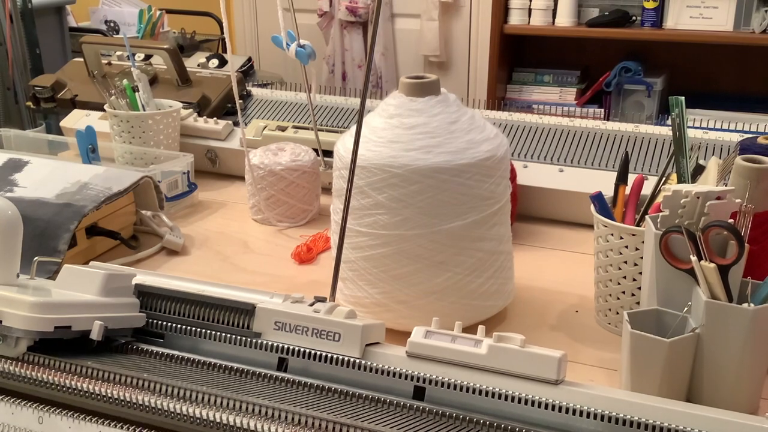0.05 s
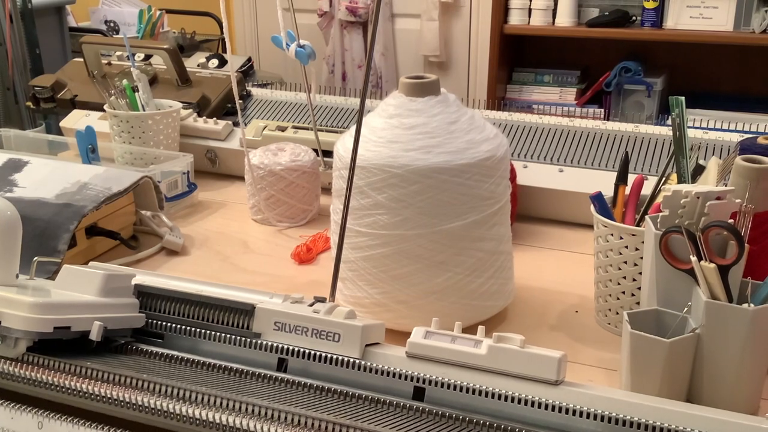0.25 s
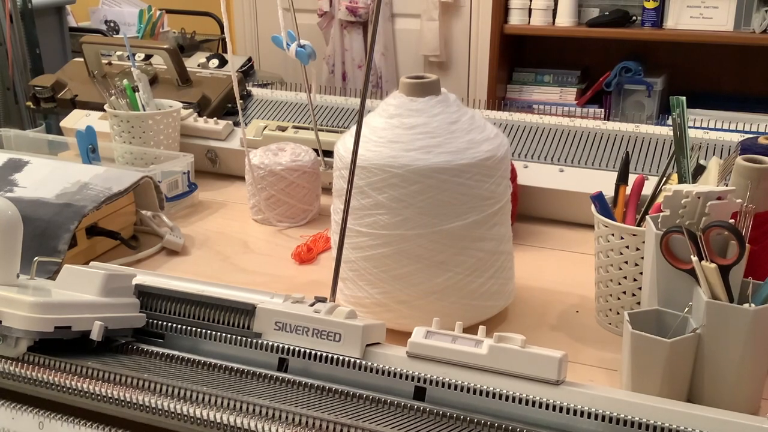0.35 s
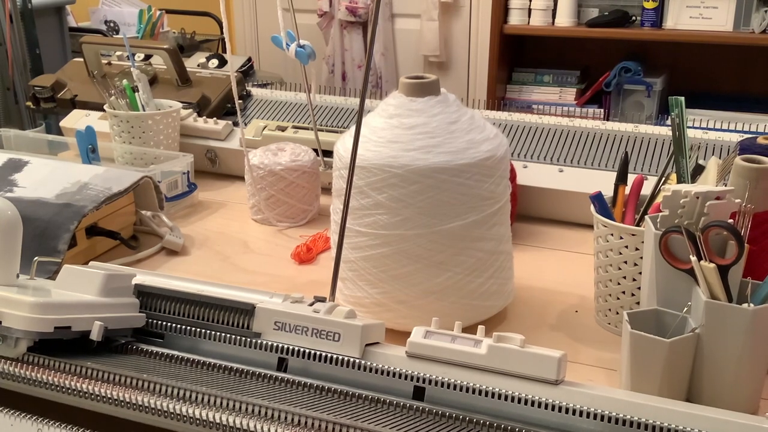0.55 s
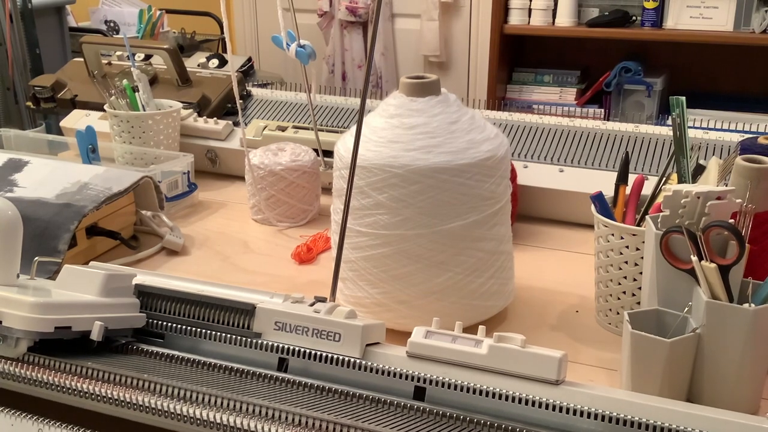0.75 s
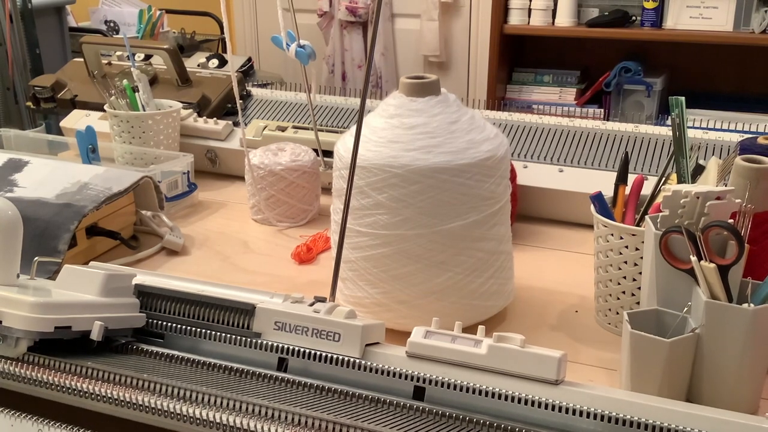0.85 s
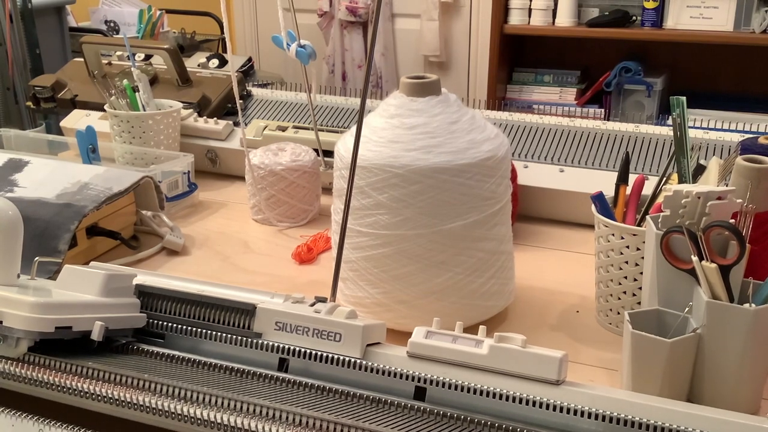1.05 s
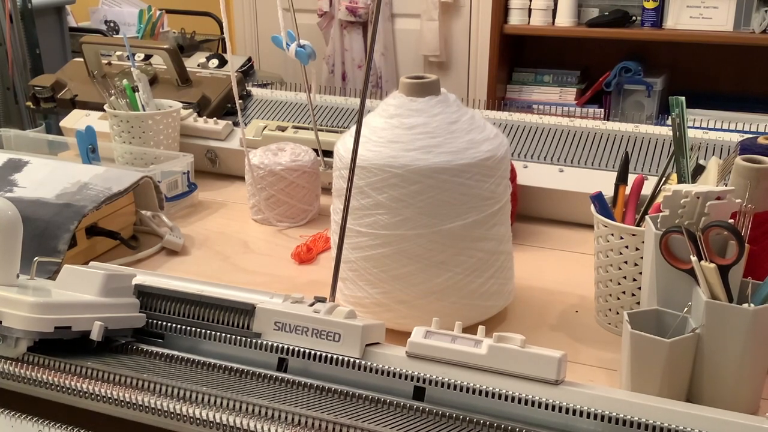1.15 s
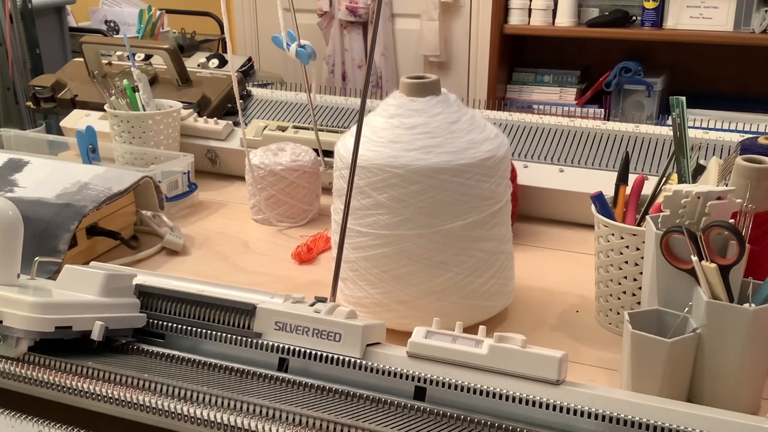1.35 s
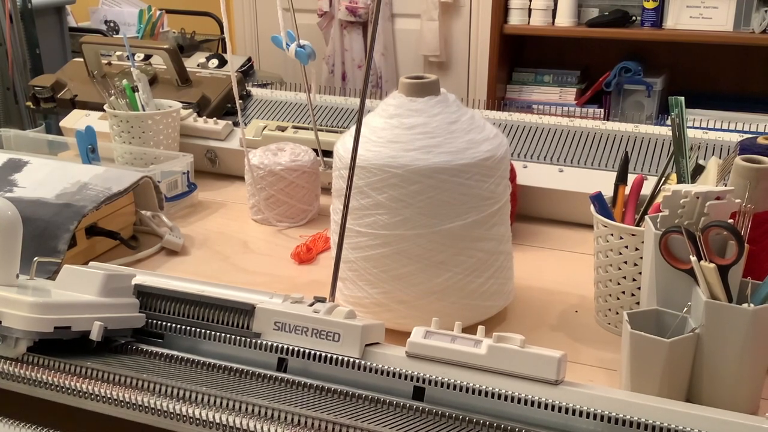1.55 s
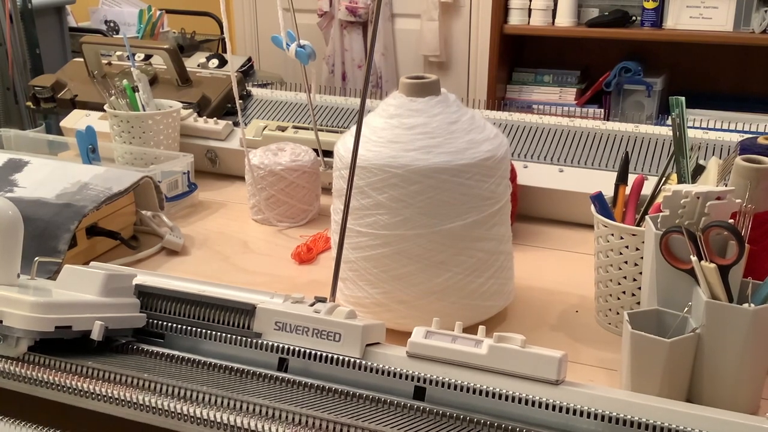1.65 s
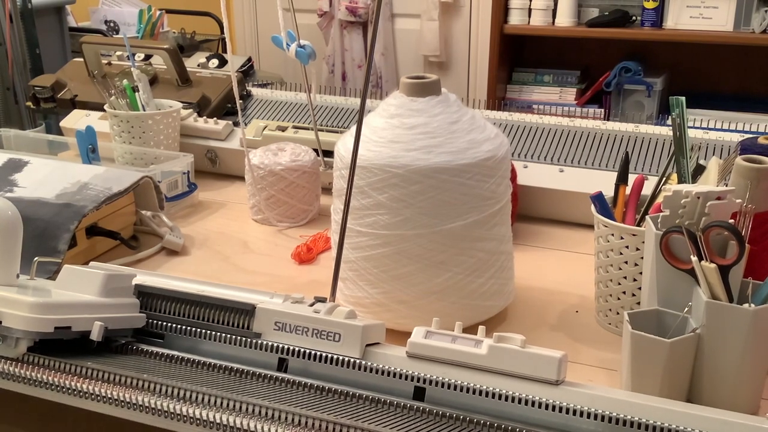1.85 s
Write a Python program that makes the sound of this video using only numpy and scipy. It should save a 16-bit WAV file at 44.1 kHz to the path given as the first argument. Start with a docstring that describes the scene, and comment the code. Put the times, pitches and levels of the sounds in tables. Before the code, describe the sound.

A knitting machine clacks and clicks in a small room. After light latch clicks, a part snaps home at about 0.2 seconds and again, louder, at 0.4, each clack rattling the needles and making the table boom briefly. From 0.8 to 1.8 seconds a lever gives five quieter, sharp clicks, most followed by a duller knock. Faint room noise lies underneath throughout.

```python
"""Knitting machine on a worktable.

In a small room a latch clicks, and a part snaps home twice with a hard clack that rattles the
needle bed and sets the table booming. Then a lever clicks five times, most clicks followed by a
duller knock on its stop, over faint room noise. Each contact is a burst of bending waves plus
the ringing modes of the part struck."""
import sys
import numpy as np
from scipy import signal
from scipy.fft import rfft, irfft
from scipy.io import wavfile

SR = 44100
rng = np.random.default_rng(int(sys.argv[2]) if len(sys.argv) > 2 else 0)


def output_pcm(signal):
    """Save a mono or channel-first signal as 16-bit PCM at the path in sys.argv[1].

    Samples are clipped to [-1, 1] before scaling.
    """
    pcm = np.clip(np.atleast_2d(signal).T, -1, 1) * 32767
    wavfile.write(sys.argv[1], SR, np.round(pcm).astype(np.int16))


N = 83790
T = np.arange(int(.8 * SR)) / SR
BANDS_HZ = 50 * 2 ** (np.arange(18) / 2)


def amp(db):
    """Decibels to gain."""
    return 10 ** (np.asarray(db) / 20)


def along(points, hz):
    """Interpolate (Hz, value) points on a log frequency axis."""
    f, v = np.transpose(points)
    return np.interp(np.log(hz + 1), np.log(f + 1), v)


def sized(x):
    """Scale to the energy of 10 ms at rms 1."""
    return x / np.sqrt(np.sum(x ** 2, axis=-1, keepdims=True) / (SR / 100) + 1e-20)


def add(out, start_s, x):
    """Mix x into out from start_s."""
    i = max(0, round(start_s * SR))
    out[i:i + len(x)] += x[:len(out) - i]


def fade(t, rise_s, t60):
    """Quick rise and exponential decay from t = 0."""
    t = np.maximum(t, 0)
    return (1 - np.exp(-t / rise_s)) * np.exp(-np.log(1000) * t / t60)


def noise_bands(size):
    """White noise split into half octaves."""
    octaves = np.log2(np.fft.rfftfreq(size, 1 / SR) + 1) - np.log2(BANDS_HZ)[:, None]
    return irfft(rfft(rng.standard_normal(size)) * np.maximum(0, 1 - 2 * abs(octaves)), size)


# Bending-wave decay. Each row: frequency in Hz, base T60 in seconds.
BODY_T60 = [(100, .25), (600, 0.18), (1500, 0.079), (4000, 0.041), (12000, 0.013)]


def strike(colour, modes, tilt, ring_db, ring_scale, body_scale, rise_s, wet_db, favour=(1000, 0)):
    """One contact: dense bending waves, treble first, and the part's distinct modes."""
    def emphasis_db(f):
        """Tilt above 500 Hz, plus the range favoured by the point of contact."""
        favour_hz, favour_db = favour
        bump = np.exp(-(np.log2(f / favour_hz) / 0.28) ** 2 / 2)
        return tilt * np.log2(np.maximum(f, 500) / 2000) + favour_db * bump

    bands = noise_bands(size=8192)
    t, hz = T[:bands.shape[1]], BANDS_HZ[:, None]
    travel_s, band_rise_s = 0.0017 * 1000 / hz, rise_s * np.sqrt(1000 / hz)
    waves = sized(bands * fade(t - travel_s, band_rise_s, body_scale * along(BODY_T60, hz)))
    body = sized(np.sum(waves * amp(along(colour, hz) + emphasis_db(hz)), axis=0))
    mode_hz, width_hz, db = np.transpose(modes)[:, :, None]
    t60 = np.log(1000) / (np.pi * np.maximum(width_hz / ring_scale, .008 * mode_hz))
    detune = 1 + .008 * rng.standard_normal(mode_hz.shape)  # the hand's grip shifts the modes
    cycles = mode_hz * detune * t + rng.random(mode_hz.shape)
    gain = amp(db + emphasis_db(mode_hz) + rng.standard_normal(mode_hz.shape))
    rings = sized(np.sin(2 * np.pi * cycles) * fade(t, rise_s, t60))
    rings *= amp(ring_db) * gain / np.linalg.norm(gain)
    spread = 1 / (1 + (mode_hz / 3800) ** 2)  # high modes beam at the microphone, past the room
    beamed = np.sum(rings * (1 - spread), axis=0)
    return in_room(body + np.sum(rings * spread, axis=0), wet_db, beamed)


# Hard clacks. Each row: start in seconds, level in dB, tilt in dB/octave, table boom in dB,
# favoured frequency in Hz, its gain in dB.
CLACKS = [(0.2263, -20.5, -1, -31.5, 2486, 0), (.408, -17, 0, -33.5, 9000, -1.5)]
# Clack bending waves. Each row: frequency in Hz, band level in dB.
CLACK_COLOUR = [(50, -28.5), (100, -9), (300, -12.5), (650, 1), (1100, -0.5), (1700, -1.5), (2500, 3),
                (3400, -3.5), (4600, 0), (6500, -7.5), (10000, 1), (15000, -14)]
# Needle bed modes. Each row: frequency in Hz, base width in Hz, level in dB.
BED_MODES = [(577, 30, -6), (665.8, 15, -4.5), (752, 18, -4), (1043, 31, -13), (1380, 16, -10),
             (1748, 34, -30.5), (2420, 24, -8), (2591, 67, -4), (4646, 57, -10.5), (6110, 46, -21.5),
             (7100, 70, -18), (8080, 220, -10.5), (9200, 40, -17.5), (10600, 85, -6.5), (11300, 60, -16.5)]


def clacks():
    """A part snaps home on the needle bed, shaking the table and the needles."""
    out = np.zeros(N)
    for start_s, db, tilt, boom_db, *favour in CLACKS:
        blow = strike(CLACK_COLOUR, BED_MODES, tilt, ring_db=-1, ring_scale=1.0, body_scale=0.98,
                      rise_s=0.00094, wet_db=-9.5, favour=favour)
        add(out, start_s, amp(db) * blow)
        add(out, start_s, amp(boom_db) * table_boom())
        add(out, start_s, amp(db) * needle_chatter())
    return out


# Loose parts. Each row: start in seconds, level in dB, tilt in dB/octave.
RATTLES = [(0.2535, -34.5, 3.5), (.432, -27.5, -1), (0.4367, -31, 2), (.443, -27, 1.5), (0.458, -39, 3.5),
           (.573, -61, -2.5), (1.573, -47, -1), (1.595, -58, 16), (1.633, -50, -1)]
# Rattle and chatter spectrum. Each row: frequency in Hz, band level in dB.
RATTLE_COLOUR = [(150, -10), (600, -1.5), (1500, -1), (2500, -5.5), (5000, -1.5), (9000, -8), (15000, -17)]


def rattles():
    """Loose parts knock and briefly ring the needle bed."""
    out = np.zeros(N)
    for start_s, db, tilt in RATTLES:
        rattle = strike(RATTLE_COLOUR, BED_MODES, tilt, ring_db=-7, ring_scale=.6, body_scale=0.68,
                        rise_s=0.0025, wet_db=-3)
        add(out, start_s, amp(db) * rattle)
    return out


def needle_chatter(gain_db=-10.5, delay_s=.028, spread_s=0.0078, ticks_per_s=900):
    """Needles shaken in their slots: a swarm of tiny ticks."""
    bands = noise_bands(size=8192)
    t = T[:bands.shape[1]]
    tick_bands = sized(bands * fade(t, rise_s=.0003, t60=0.012))
    tick = np.sum(tick_bands * amp(along(RATTLE_COLOUR, BANDS_HZ[:, None])), axis=0)
    contacts = rng.standard_normal(len(t)) * (rng.random(len(t)) < ticks_per_s / SR)
    contacts *= np.exp(-((t - delay_s) / spread_s) ** 2 / 2)
    return amp(gain_db) * in_room(sized(signal.fftconvolve(contacts, tick)), wet_db=-7.5)


# Low table modes. Each row: frequency in Hz, level in dB, T60 in seconds.
TABLE_MODES = [(69, -4, 0.4), (97.74, -7, 0.88), (135.8, 2.5, 0.56), (195, -13, 0.41), (262.8, -5.5, 0.14),
               (300, -15.5, 0.1), (403.4, -9, 0.28), (587, -13.5, 1), (610, -12, 0.36), (642, -11, 0.88),
               (726, -16.5, .55), (725, -1.5, 0.44), (876, -20.5, 0.45), (1034, -18, 0.28)]


def table_boom(delay_s=.014, rise_s=0.0073):
    """The table takes up a blow slowly and hums on."""
    return sum(amp(db) * np.sin(2 * np.pi * (hz * T + rng.random())) * fade(T - delay_s, rise_s, t60)
               for hz, db, t60 in TABLE_MODES)


# Lever clicks. Each row: start in seconds, level in dB, tilt in dB/octave, table boom in dB,
# favoured frequency in Hz, its gain in dB.
LEVER_CLICKS = [(0.8597, -37, 0.1, -65, 2540, 6.5), (1.0822, -32, -0.44, -53, 4000, 1.5),
                (1.3285, -33.5, 0.1, -67, 4300, 0), (1.5109, -32, 1.3, -49, 1480, 3.5),
                (1.6624, -30, -0.56, -62.5, 2360, 1)]
# Lever bending waves. Each row: frequency in Hz, band level in dB.
LEVER_COLOUR = [(100, -21), (350, -9), (600, -6), (1300, 0.5), (2300, -2), (3200, -5), (4500, 0.5),
                (6800, -19.5), (10000, -11), (15000, -15.5)]
# Lever modes. Each row: frequency in Hz, base width in Hz, level in dB.
LEVER_MODES = [(1170, 10, -0.5), (1564, 63, 3), (1890, 54, -12), (2390, 70, 7.5), (2786, 98, 0.5),
               (3025, 57, 1.5), (3152, 24, -1.5), (4018, 160, 7.5), (7070, 140, -12), (9270, 29, -9)]


def lever_clicks():
    """The lever engages with a sharp click that stirs the table."""
    out = np.zeros(N)
    for start_s, db, tilt, boom_db, *favour in LEVER_CLICKS:
        click = strike(LEVER_COLOUR, LEVER_MODES, tilt, ring_db=-4.5, ring_scale=1.0, body_scale=1.0,
                       rise_s=0.00075, wet_db=-6, favour=favour)
        add(out, start_s, amp(db) * click)
        add(out, start_s, amp(boom_db) * table_boom())
    return out


# Knocks on the stop. Each row: start in seconds, level in dB, tilt in dB/octave, table boom in dB,
# favoured frequency in Hz, its gain in dB.
KNOCKS = [(.797, -50.5, -7.5, -60.5, 450, -3), (.927, -35.5, 2.4, -52, 687, 10),
          (.985, -63, 10, -79, 714, 26), (1.391, -35.5, 1, -56, 1210, -4), (1.545, -33, 3.5, -73, 900, 4),
          (1.609, -42, -3, -52, 600, 13), (1.726, -40, -4.5, -70, 590, 7.5),
          (1.7546, -34.5, 1.2, -69, 1850, 11), (1.772, -44.5, -2, -65, 780, 5)]
# Knock bending waves. Each row: frequency in Hz, band level in dB.
KNOCK_COLOUR = [(60, -59), (130, -3.5), (300, -0.5), (700, 6), (1100, -1.5), (1600, 0), (2500, -4.5),
                (4500, -11), (7000, -24.5), (15000, -34)]
# Stop modes. Each row: frequency in Hz, base width in Hz, level in dB.
STOP_MODES = [(750, 145, -4), (1022, 67, -9.5), (1390, 67, -11), (2100, 40, -23), (2485, 27, -19.5),
              (2900, 15, -18)]


def lever_knocks():
    """The lever meets its stop with a dull knock that stirs the table."""
    out = np.zeros(N)
    for start_s, db, tilt, boom_db, *favour in KNOCKS:
        knock = strike(KNOCK_COLOUR, STOP_MODES, tilt, ring_db=-6.5, ring_scale=1.8, body_scale=1.3,
                       rise_s=0.00067, wet_db=-11, favour=favour)
        add(out, start_s, amp(db) * knock)
        add(out, start_s, amp(boom_db) * table_boom())
    return out


# Latch clicks. Each row: start in seconds, level in dB, tilt in dB/octave.
LATCH_CLICKS = [(0.0098, -34, 0.5), (.180, -33, 0.5), (0.3526, -37, 0), (0.366, -36, 0)]
# Latch bending waves. Each row: frequency in Hz, band level in dB.
LATCH_COLOUR = [(100, -21), (350, -17.5), (700, -9), (1300, -2.5), (2200, -1), (3200, -10.5), (4500, -3.5),
                (6500, -19), (9500, -10), (15000, -31)]
# Latch modes. Each row: frequency in Hz, base width in Hz, level in dB.
LATCH_MODES = [(1166, 7.6, -5.5), (1280, 49, 10.5), (1546, 45, -26), (2450, 110, -17), (2750, 35, -11.5),
               (4367, 93.4, 11), (8000, 43, -8.5), (8580, 45, -17.5)]


def latch():
    """Light contacts ring the latch."""
    out = np.zeros(N)
    for start_s, db, tilt in LATCH_CLICKS:
        click = strike(LATCH_COLOUR, LATCH_MODES, tilt, ring_db=-5, ring_scale=0.4, body_scale=0.88,
                       rise_s=0.0018, wet_db=-7)
        add(out, start_s, amp(db) * click)
    return out


# Room decay. Each row: frequency in Hz, T60 in seconds.
ROOM_T60 = [(100, 0.6), (600, 0.27), (2000, 0.26), (5000, 0.22), (14000, .22)]


def in_room(x, wet_db, beamed=0, delay_s=0.002, rise_s=0.0028):
    """Direct sound plus a diffuse tail; the beamed part arrives directly only."""
    hz, t, spectra = signal.stft(rng.standard_normal(SR // 2), SR, nperseg=256)
    decay = fade(t - delay_s, rise_s, along(ROOM_T60, hz)[:, None])
    tail = signal.istft(spectra * decay, SR, nperseg=256)[1]
    out = signal.fftconvolve(x, amp(wet_db) * tail / np.linalg.norm(tail))
    out[:len(x)] += x + beamed
    return out


# Room noise spectrum. Each row: frequency in Hz, relative density in dB.
AIR_SPECTRUM = [(15, -38), (25, -24), (101, -7.5), (169, -15), (227, -13.5), (552, -13.5), (614, -10.5),
                (871, -18), (2010, -25), (2850, -30), (3090, -29.5), (3720, -34), (4500, -26), (9300, -41),
                (15500, -39)]
# Treble of the room noise. Each row: time in seconds, gain in dB.
HISS_LEVEL = [(0, -1.5), (.17, 0), (.65, -0.5), (1.3, 3.5), (1.7, 5), (1.819, -4), (1.9, -9)]


def room_noise(level_db=-61, hiss_from_hz=2500):
    """Faint air whose hiss swells a little and sinks away."""
    hz = np.fft.rfftfreq(N, 1 / SR)
    spectrum = rfft(rng.standard_normal(N)) * amp(along(AIR_SPECTRUM, hz))
    air = irfft(spectrum, N)
    hiss = irfft(spectrum * hz ** 2 / (hz ** 2 + hiss_from_hz ** 2), N)
    hiss_gain = amp(np.interp(np.arange(N) / SR, *np.transpose(HISS_LEVEL)))
    return amp(level_db) * (air - hiss + hiss_gain * hiss) / air.std()


def scene():
    """Machine and room at one microphone."""
    return (latch() + clacks() + rattles() + lever_clicks() + lever_knocks() + room_noise())[None]


def record(dry):
    """The recorder thins the deep bass, rounds the highest peaks and stops at its band limit."""
    low_cut_hz, ceiling, top_hz = 70, 0.69, 16000
    x = signal.sosfilt(signal.butter(2, low_cut_hz, "high", fs=SR, output="sos"), dry)
    x = x / (1 + (x / ceiling) ** 4) ** .25
    return signal.sosfilt(signal.ellip(10, .1, 80, top_hz, fs=SR, output="sos"), x)


dry = scene()
out = record(dry)
output_pcm(out)
```